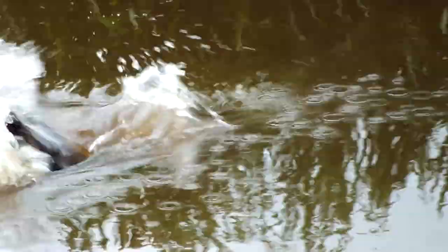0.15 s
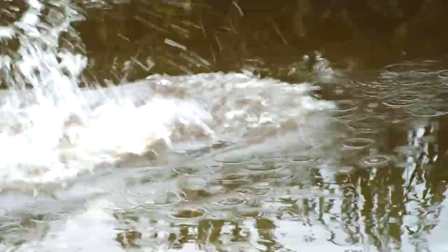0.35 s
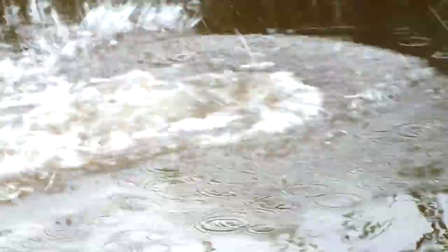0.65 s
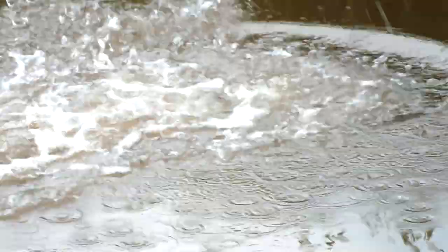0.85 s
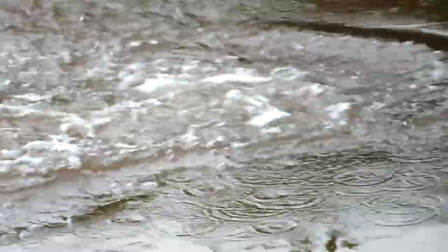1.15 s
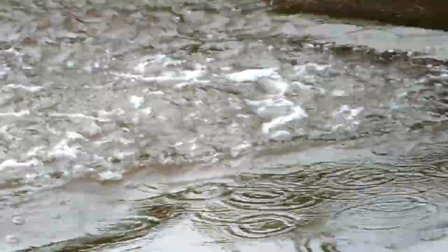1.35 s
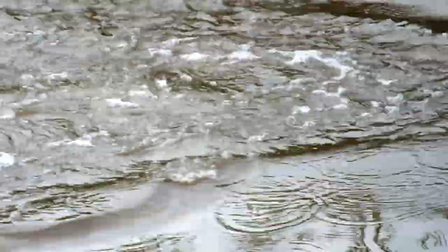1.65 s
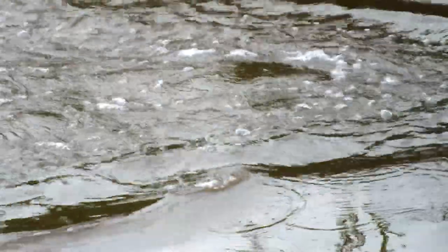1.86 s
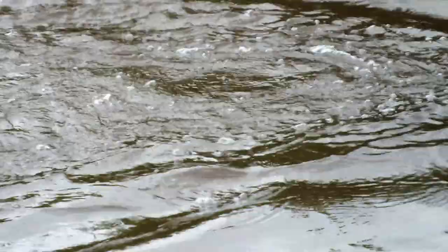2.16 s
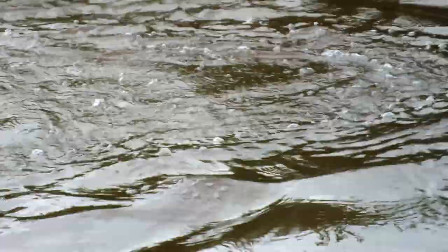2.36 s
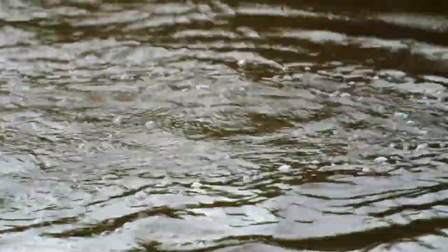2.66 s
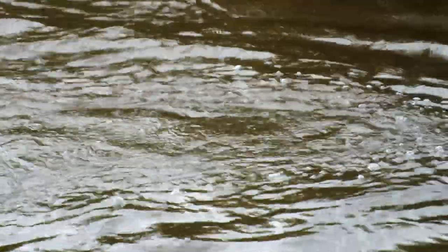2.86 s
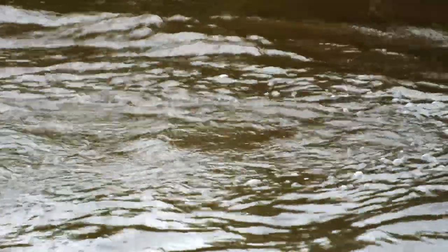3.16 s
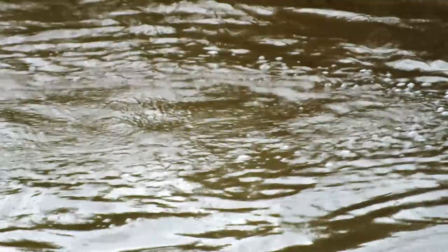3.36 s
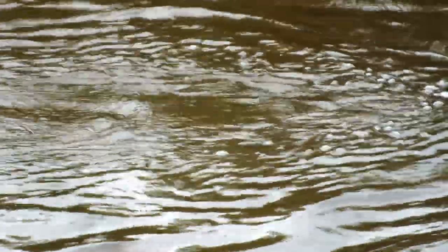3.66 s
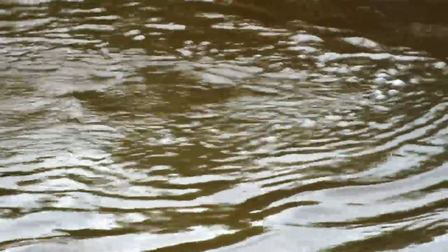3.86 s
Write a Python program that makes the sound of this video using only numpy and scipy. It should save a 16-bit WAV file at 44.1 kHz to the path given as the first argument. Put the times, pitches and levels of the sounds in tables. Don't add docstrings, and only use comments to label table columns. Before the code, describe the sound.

Close outdoor recording at a quiet river: a heavy gulping splash with fizzing foam and spray, then soft air, a bird's clear whistled phrases with slight echo, and hard handling knocks and rubbing on the device.

```python
import sys
import numpy as np
from scipy import signal
from scipy.io import wavfile
from scipy.ndimage import uniform_filter1d

SR = 44100
rng = np.random.default_rng(int(sys.argv[2]) if len(sys.argv) > 2 else 0)


def voltage_ratio(level):
    return 10 ** (np.asarray(level, float) / 20)


def output_pcm(signal):
    pcm = np.clip(np.atleast_2d(signal).T, -1, 1) * 32767
    wavfile.write(sys.argv[1], SR, np.round(pcm).astype(np.int16))


N = 176400
T = np.arange(N) / SR


def rms_one(x):
    return x / np.sqrt(np.mean(x ** 2) + 1e-20)


def curve(rows, quiet_db=-120):
    s, db = np.transpose(rows)
    s = np.r_[s[0] - .1, s, s[-1] + .1]
    return np.interp(T, s, np.r_[quiet_db, db, quiet_db])


def at_hz(points, hz):
    point_hz, value = np.array(points)[:, :2].T
    return np.interp(np.log(hz), np.log(point_hz), value)


def drift(rate):
    hop = 40
    pole = np.exp(-2 * hop * np.pi * rate / SR)
    white = rng.standard_normal(N // hop + 2002)
    slow = signal.lfilter([1], [1, -2 * pole, pole * pole], white)[2000:]
    return np.interp(np.arange(N) / hop, np.arange(len(slow)), rms_one(slow))


def ring(clicks, hz, t60):
    pole = voltage_ratio(-60 / (t60 * SR))
    w = 2 * np.pi * hz / SR
    return signal.lfilter([0, np.sin(w)], [1, -2 * pole * np.cos(w), pole * pole], clicks + 1e-18)


def late(x, s):
    return np.interp(T - s, T, x, left=0)


def bandpass(x, low_hz, high_hz):
    return signal.sosfilt(signal.butter(2, [low_hz, high_hz], "band", fs=SR, output="sos"), x)


def banded(spectrum, likeness, patchy_db, flicker):
    out = 0
    together = drift(flicker)
    edges = 45 * 2 ** np.arange(0, 8.9, .5)
    white = rng.standard_normal((2, 2, N))
    for k, (low, high) in enumerate(zip(edges, edges[1:])):
        mid, side = bandpass(white[k % 2], low, high)
        hz = np.sqrt(low * high)
        alike = np.clip(at_hz(likeness, hz), -.9, .99)
        side = side * np.sqrt((1 - alike) / (1 + alike))
        band_db = at_hz(spectrum, hz) + patchy_db * (1.26 * together + drift(flicker))
        out = out + voltage_ratio(band_db) * (mid + side * [[1], [-1]])
    return out / np.sqrt(np.mean(out.mean(axis=0) ** 2))


def grains(per_s, low_hz, high_hz, cycles, spread_db, wide_db):
    sizes = voltage_ratio(spread_db * np.minimum(rng.exponential(1, N), 4)) * rng.choice([-1, 1], N)
    sizes = sizes * (rng.random(N) < per_s / SR)
    dealt = rng.integers(0, 16, N)
    pan = wide_db * rng.standard_normal(N)
    both = sizes * voltage_ratio(pan * [[.5], [-.5]])
    out = 0
    for k, hz in enumerate(np.geomspace(low_hz, high_hz, num=16)):
        out = out + ring(both * (dealt == k), hz, cycles / hz)
    return rms_one(out)


def blips(rows, cycles, rise, swell_s):
    out = np.zeros((2, N + SR))
    t = T[:SR // 8]
    for s, db, hz, *pan in rows:
        shape = (1 - np.exp(-t / swell_s)) * voltage_ratio(-60 * t * hz / cycles)
        wave = shape / shape.max() * np.sin(2 * np.pi * hz * t * (1 + rise * t * hz / cycles))
        start = int(s * SR)
        out[:, start:start + len(t)] += voltage_ratio(db + np.sum(pan) * np.array([[.5], [-.5]])) * wave
    return out[:, :N]


# (time [s], frequency [Hz], level [dB])
HEAVE_PATH = [(0, 37.5, -29.5), (.05, 44.3, -51), (0.074, 65, -26), (.1, 73.4, -64), (.16, 60, -66)]


def heave():
    s, hz, db = np.transpose(HEAVE_PATH)
    phase = 2 * np.pi * np.cumsum(np.interp(T, s, hz)) / SR
    return voltage_ratio(curve(np.c_[s, db])) * np.sin(phase)


# (time [s], peak level [dB], frequency [Hz])
CAVITY_GULPS = [(0.066, -24.5, 369), (0.121, -25, 480), (0.142, -24.5, 368), (0.199, -36.5, 400),
                (0.217, -28.5, 400), (0.296, -27, 443), (0.323, -31.5, 450)]


def gulps():
    return blips(CAVITY_GULPS, cycles=16.0, rise=.05, swell_s=.012)


# (time [s], peak level [dB], frequency [Hz])
WATER_SMACKS = [(0.0535, -20, 747), (0.088, -33, 2040), (0.17, -27, 1270), (0.297, -29, 2040),
                (0.496, -32.5, 870), (0.552, -34, 900), (0.581, -30.5, 1770), (0.655, -29, 1940),
                (0.659, -34, 1250), (0.687, -31.5, 2290), (0.7152, -32, 1720), (0.716, -29.5, 2810),
                (0.915, -38, 1290)]


def smacks():
    return blips(WATER_SMACKS, cycles=15.7, rise=.03, swell_s=0.00047)


# (time [s], level [dB])
CHURN_LEVEL = [(0, -37), (.04, -41), (.06, -32), (.2, -37.5), (.33, -34.5), (.45, -38.5), (.7, -40),
               (.98, -51.5), (1.4, -104)]
# (frequency [Hz], band level [dB])
FOAM_SPECTRUM = [(150, -45), (400, 3), (640, -13), (860, -0.5), (2100, 0), (2700, -8.5), (4200, -17),
                 (15500, -69)]
# (frequency [Hz], coherence [-1 to 1])
NEAR_COHERENCE = [(200, 0.95), (400, 0.94), (1300, 1), (4400, 0.089), (8000, 0.28), (15000, 1)]


def churn():
    foam = voltage_ratio(-4) * banded(FOAM_SPECTRUM, NEAR_COHERENCE, patchy_db=1.8, flicker=35.0)
    gurgle_gone_s = 0.44
    gurgle = grains(180, 354.5, 1044, 25.0, spread_db=2.0, wide_db=2.0)
    gurgle = voltage_ratio(-2.5) * np.exp(-(T / gurgle_gone_s) ** 4) * gurgle
    bubbles_db = -8 - 1.5 * np.minimum(T, 1)
    bubbles = voltage_ratio(bubbles_db) * grains(500, 778, 2340, 26.0, spread_db=2.2, wide_db=7.0)
    return voltage_ratio(curve(CHURN_LEVEL)) * (foam + gurgle + bubbles)


# (time [s], level [dB])
SPRAY_LEVEL = [(0, -73), (.25, -63), (.266, -50), (.29, -63), (.85, -61.5), (1.0, -67), (1.3, -68),
               (1.46, -86)]
# (time [s], peak level [dB], frequency [Hz])
DROP_LANDINGS = [(0.6188, -46, 5980), (0.6522, -31.5, 5300), (0.7305, -38, 9720), (0.746, -52, 5970),
                 (0.8398, -52, 10900), (0.8543, -44, 6400), (0.9156, -56, 6620), (0.9415, -42, 6750),
                 (0.9595, -53, 5880), (0.983, -35, 6100), (1.0054, -49, 6130), (1.0613, -49, 10800),
                 (1.1027, -50, 11700), (1.1401, -62, 6260), (1.1983, -36.5, 10300), (1.2149, -53, 9610),
                 (1.2439, -49, 10900), (1.2575, -44, 8170), (1.29, -49, 10500), (1.3102, -50, 11400),
                 (1.3203, -44, 9810), (1.364, -42, 13200), (1.4185, -43.5, 12100)]


def patter():
    mist_db, mist_gone_s = 4.0, .85
    white = rng.standard_normal((3, N))
    mist = bandpass(white[0] + 0.96 * white[1:], 3000, 12000)
    mist = voltage_ratio(mist_db + 2 * drift(78.0)) * mist * np.exp(-(T / mist_gone_s) ** 2)
    ticks = grains(500, 5000, 13500, 9.0, spread_db=2.6, wide_db=4.0)
    drops = blips(DROP_LANDINGS, cycles=8.0, rise=0.029, swell_s=0.00012)
    return (voltage_ratio(curve(SPRAY_LEVEL)) * (mist + ticks) + drops) * [[1.15], [.85]]


# (time of a pitch top [s], rate [1/s], share falling, share at the break, break [dB], pointedness)
TRILL_SHAPES = [
    (2.289, 30.6, .6, .7, -12, 1.9),
    (2.984, 53.4, .38, .2, -14, .8),
]
# (time [s], height [Hz])
TRILL_EXCURSION = [(2.268, 0), (2.276, 500), (2.47, 860), (2.5, 0), (2.9, 0), (2.93, 700), (3.07, 330),
                   (3.11, 0)]


def trill():
    second = (T > 2.6).astype(int)
    top_s, rate, fall, gap, gap_db, point = np.array(TRILL_SHAPES)[second].T
    turn = rate * (T - top_s) % 1
    away = np.where(turn < fall, turn / fall, (1 - turn) / (1 - fall))
    height = np.interp(T, *np.transpose(TRILL_EXCURSION))
    swing = (1 - np.sin(np.pi / 2 * away) ** 1.1) ** point * height
    dip_db = gap_db * np.exp(-((turn - gap) / .08) ** 2) + 3.5 * drift(110.0)
    return swing, dip_db * np.minimum(height / 400, 1)


# (time [s], lowest frequency [Hz], level [dB])
FIRST_PHRASE = [
    [(1.865, 1900, -69), (1.894, 1860, -55.5), (1.91, 1660, -67)],
    [(1.926, 2800, -64), (1.962, 2137, -44), (1.986, 1923, -41), (2.01, 1944, -49), (2.018, 1970, -71)],
    [(2.115, 2480, -66), (2.18, 3020, -63)],
    [(2.152, 1930, -54.5), (2.194, 2053, -48), (2.226, 1964, -37), (2.24, 1820, -55), (2.256, 1935, -43),
     (2.274, 1870, -49), (2.45, 1852, -49), (2.468, 1810, -54)],
]
SECOND_PHRASE = [
    [(2.58, 2995, -56), (2.64, 2860, -55), (2.66, 2980, -39.5), (2.676, 3040, -46.5), (2.708, 2450, -44),
     (2.725, 2480, -59)],
    [(2.935, 2033, -58), (3.07, 2132, -43), (3.148, 2158, -41.5), (3.153, 2126, -43.5), (3.16, 2240, -65),
     (3.195, 2320, -59)],
    [(3.205, 1980, -53.5), (3.232, 1926, -40.5), (3.268, 1885, -43), (3.288, 1680, -52), (3.306, 1706, -66),
     (3.33, 1586, -51), (3.35, 1600, -59)],
    [(3.745, 1990, -66), (3.79, 2163, -57), (3.9, 2150, -65)],
]
# (delay [s], level [dB])
ECHOES = [(.047, -16), (.083, -35)]


def bird():
    swing, dip_db = trill()
    dry = 0
    for note in FIRST_PHRASE + SECOND_PHRASE:
        s, hz, db = np.transpose(note)
        pitch = uniform_filter1d(np.interp(T, s, hz) + swing, size=90)
        gate = np.interp(T, [s[0] - .006, s[0], s[-1], s[-1] + 0.0096], [0, 1, 1, 0])
        level = gate * voltage_ratio(np.interp(T, s, db) + dip_db + 4.5)
        dry = dry + level * np.sin(2 * np.pi * np.cumsum(pitch) / SR)
    wet = [sum(voltage_ratio(db) * late(dry, s * far) for s, db in ECHOES) for far in (1, 1.17)]
    direct = np.array([.9 * late(dry, .00013), 1.1 * dry]) * 1.35
    return direct + wet


# (middle [s], half width [s], level [dB])
HAND_SLIDES = [(2.598, 0.071, -47.5), (2.72, 0.08, -45.5), (2.957, 0.05, -50.5), (3.1, 0.03, -55.5),
               (3.389, 0.041, -49), (3.49, 0.055, -55.5), (3.609, 0.046, -50), (3.669, 0.025, -47.5),
               (3.772, 0.029, -47), (3.83, 0.024, -56.5), (3.874, 0.029, -50)]
# (frequency [Hz], band level [dB])
SLIDE_SPECTRUM = [(100, -10), (300, -3.5), (1160, -1), (2750, -9.5), (4200, -20.5), (6000, -26),
                  (12000, -31), (15500, -44)]
# (frequency [Hz], coherence [-1 to 1])
WIDE_COHERENCE = [(60, 0.2), (700, 0.18), (1300, 0.15), (4400, -0.46), (8000, -0.2), (15000, 1)]


def sliding_grip():
    effort = sum(voltage_ratio(db) * np.exp(-np.abs((T - s) / half) ** 3.5) for s, half, db in HAND_SLIDES)
    return effort * banded(SLIDE_SPECTRUM, WIDE_COHERENCE, patchy_db=1.0, flicker=40.0)


# (time [s], level [dB])
STRAIN_LEVEL = [(1.7, -103), (2.3, -53), (2.5, -58), (2.6, -44.5), (2.97, -53.5), (3.1, -67), (3.55, -51),
                (4.0, -55.5)]


def groaning_shell():
    shell = rms_one(ring(rng.standard_normal((3, N)), hz=205, t60=.045))
    groan = voltage_ratio(curve(STRAIN_LEVEL) + 2.5 * drift(25.0)) * shell
    return groan[0] + groan[1:]


# (time [s], level [dB], crack delay [s], crack level [dB])
FINGER_TAPS = [
    (1.4898, -36.5, 0.0011, -66),
    (2.4995, -27.5, 0.00079, -57),
    (2.8006, -10, .0024, -29.5),
    (3.9171, -12.5, 0.036, -42),
]
# (frequency [Hz], level [dB], decay time T60 [s])
CASE_MODES = [(405, -21.5, 0.053), (690, -22.5, 0.059), (900, 3, 0.0061), (1540, -7, 0.012),
              (2700, -29, 0.019)]


def taps():
    out = np.zeros((2, N))
    for s, db, wait_s, crack_db in FINGER_TAPS:
        push = np.exp(-((T - s) / .00017) ** 2) * (T - s)
        push = 2 * push / np.abs(push).sum()
        body = 0
        for hz, level_db, t60 in CASE_MODES:
            body = body + voltage_ratio(level_db + rng.normal(0, 1, (2, 1))) * ring(push, hz, t60)
        out += voltage_ratio(db) * np.array([late(body[0], .0003), body[1]])
        t = T - s - wait_s
        noise = rng.standard_normal((3, N))
        crack = (t > 0) * np.exp(-np.abs(t) / 0.0013) * (noise[0] + 1.1 * noise[1:])
        out += voltage_ratio(crack_db) * bandpass(crack, 1500, 9500)
    return out


# (time [s], peak level [dB], frequency [Hz], left-right difference [dB])
CASE_BUMPS = [(0.657, -37, 230, -15.5), (0.956, -36.5, 203, -16), (1.13, -45.5, 170, -13),
              (1.486, -36, 220, -13), (1.519, -40, 216, -17.5), (1.77, -47.5, 172, -8),
              (1.823, -40.5, 193, -6), (1.921, -41, 198, -7)]


def bumps():
    sag_s, sag_db, sag_pitch = 0.0177, -7, .6
    sags = [(s + sag_s, db + sag_db, hz * sag_pitch, pan) for s, db, hz, pan in CASE_BUMPS]
    return blips(CASE_BUMPS + sags, cycles=9.0, rise=-0.031, swell_s=0.00039)


# (time [s], peak level [dB], frequency [Hz])
NAIL_CATCHES = [(3.096, -38, 503), (3.3575, -35, 754), (3.368, -34, 590), (3.506, -35, 427),
                (3.508, -36, 3200), (3.926, -33, 480), (3.933, -33, 348), (3.956, -33, 704)]


def catches():
    return blips(NAIL_CATCHES, cycles=3.8, rise=0, swell_s=0.00032)


# (frequency [Hz], rms level [dB])
HUM_TONES = [(50, -57.5), (1674, -62)]


def hum():
    low, high = [voltage_ratio(db + 3.5 + 1.6 * drift(2.5)) * np.sin(2 * np.pi * hz * T) for hz, db in HUM_TONES]
    return low * voltage_ratio([[2.5], [-3.5]]) + high * [[1], [-.5]]


# (frequency [Hz], band level [dB])
AIR_SPECTRUM = [(70, -4.5), (200, -7), (800, -7), (2000, -16), (3800, -21), (8000, -39.5), (12000, -36),
                (15500, -55)]


def river_air():
    return voltage_ratio(-54) * banded(AIR_SPECTRUM, WIDE_COHERENCE, patchy_db=1.0, flicker=8.9)


def scene():
    dive = heave() + gulps() + smacks() + churn() + patter()
    hands = sliding_grip() + groaning_shell() + taps() + bumps() + catches()
    return dive + bird() + hands + hum() + river_air()


def roll_off(x):
    return signal.sosfilt(signal.butter(12, 16520, fs=SR, output="sos"), x)


def record(dry):
    mix = signal.sosfilt(signal.cheby2(10, 50, 16400, fs=SR, output="sos"), dry)
    mix = signal.sosfilt(signal.butter(2, 32, "high", fs=SR, output="sos"), mix)
    return roll_off(mix)


dry = scene()
out = record(dry)
output_pcm(out)
```